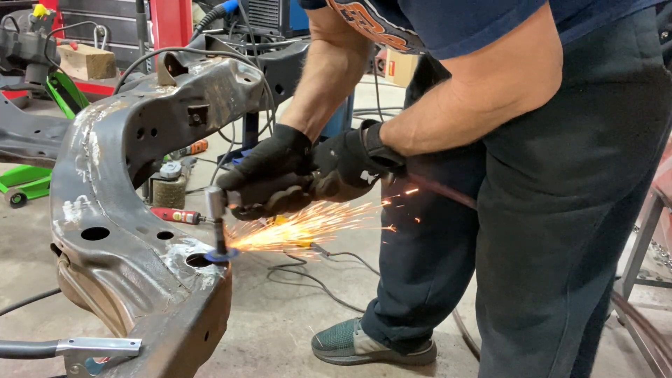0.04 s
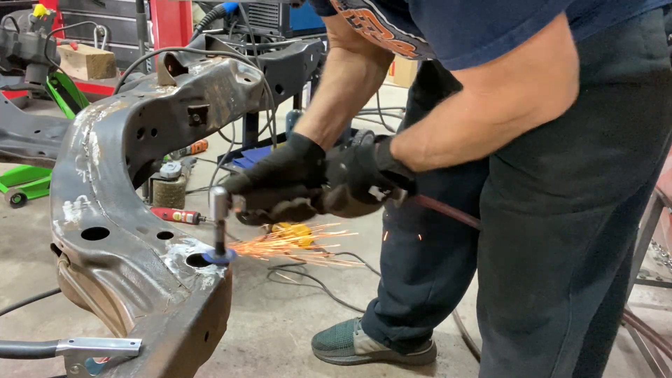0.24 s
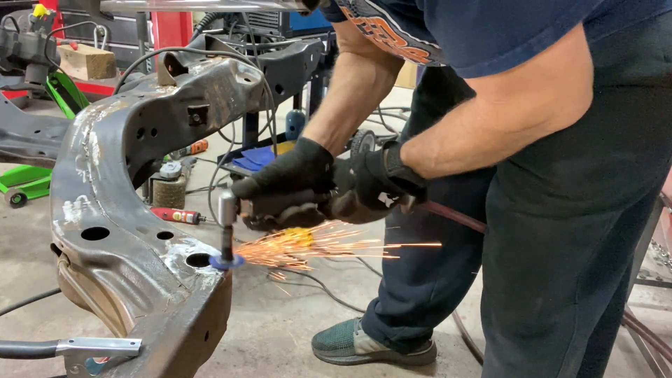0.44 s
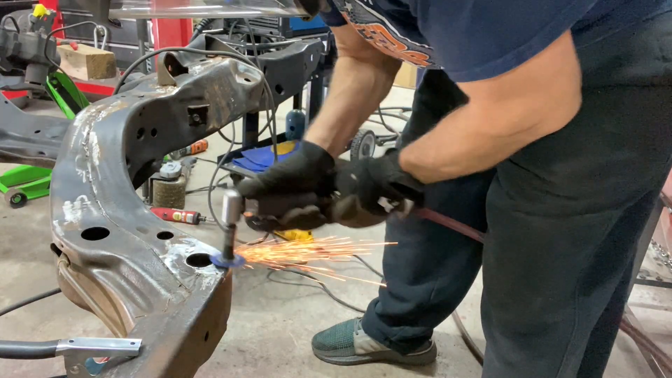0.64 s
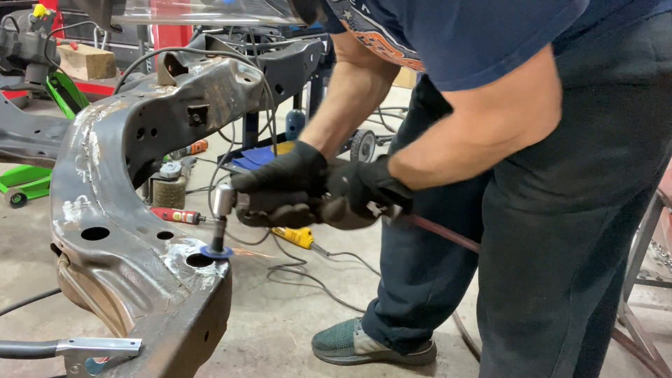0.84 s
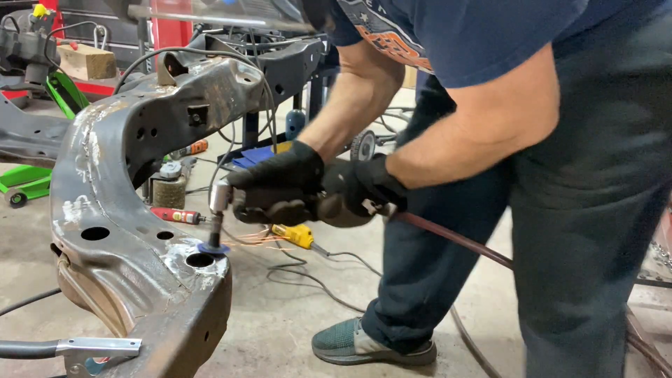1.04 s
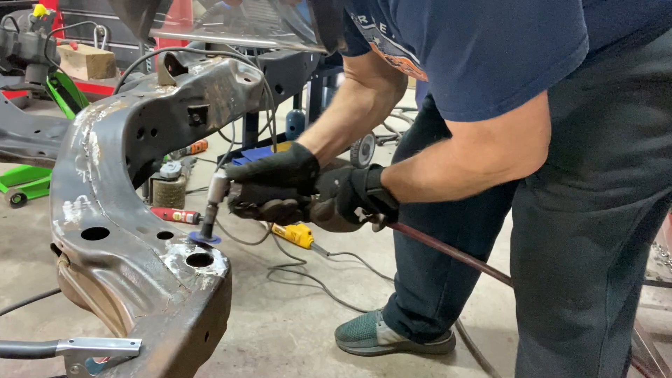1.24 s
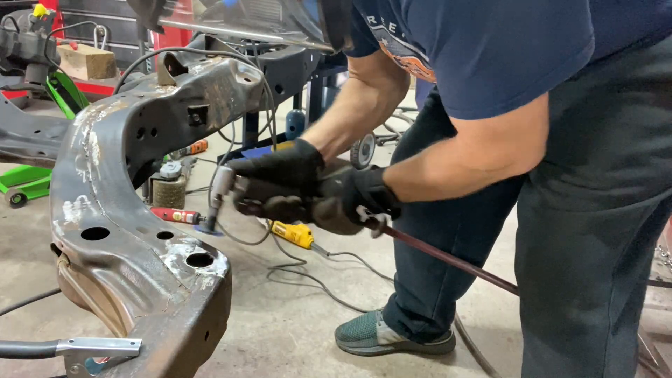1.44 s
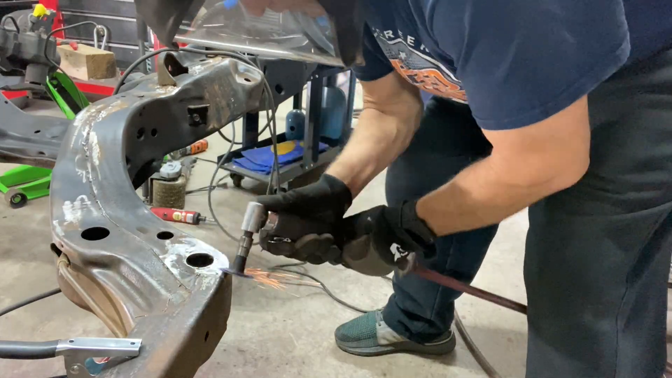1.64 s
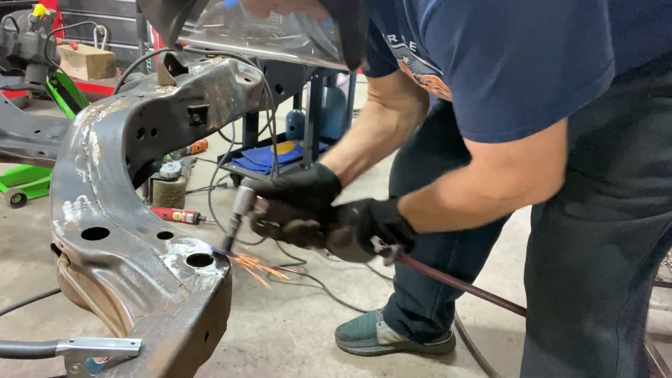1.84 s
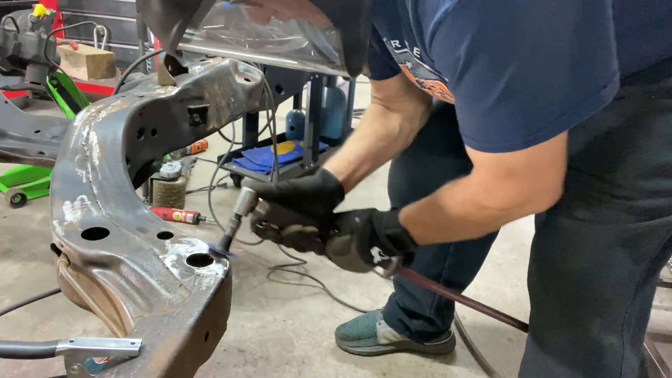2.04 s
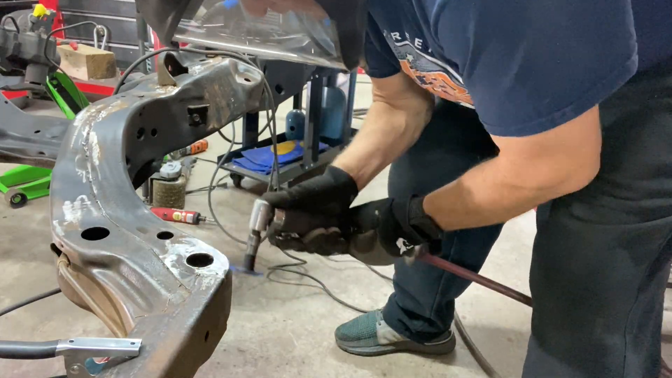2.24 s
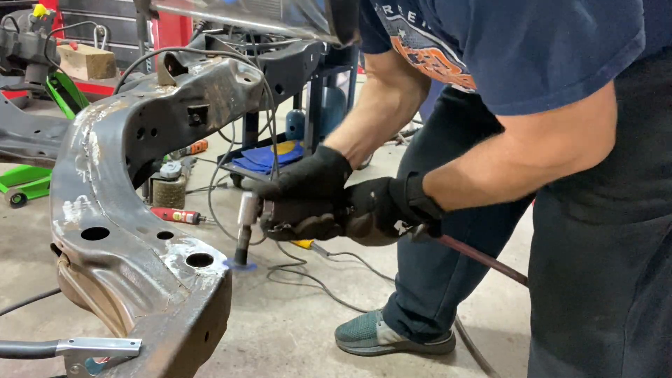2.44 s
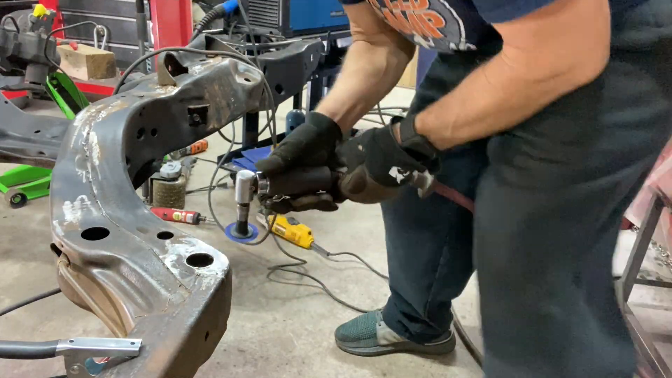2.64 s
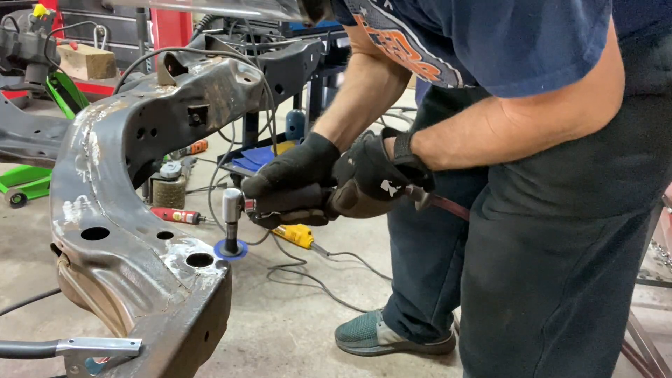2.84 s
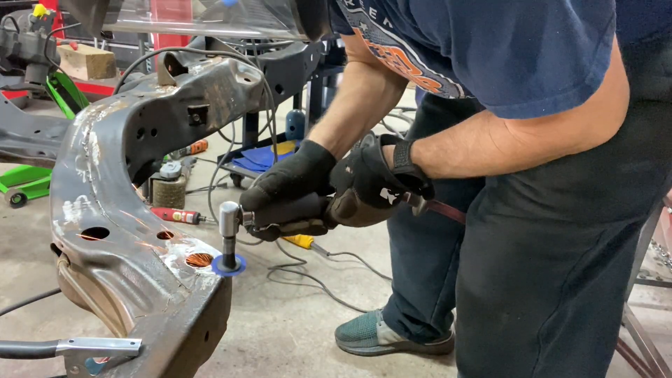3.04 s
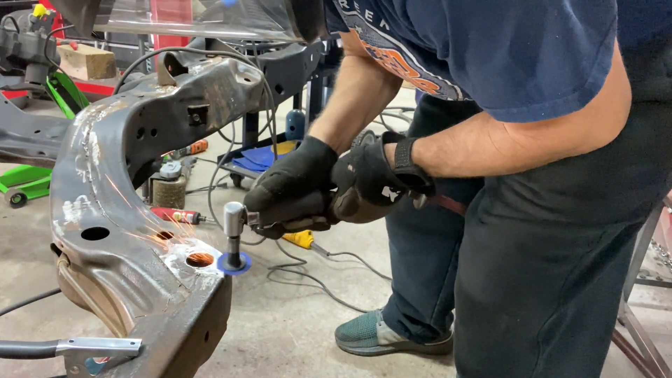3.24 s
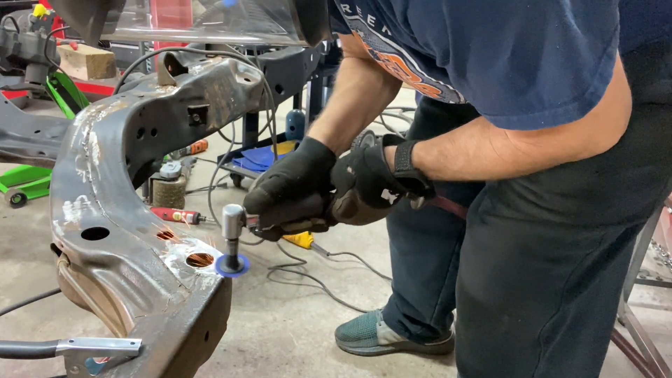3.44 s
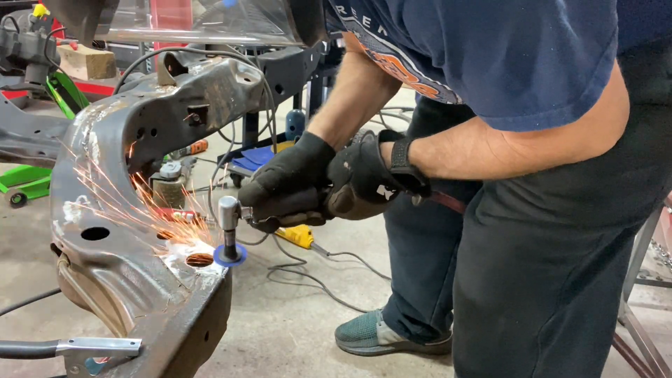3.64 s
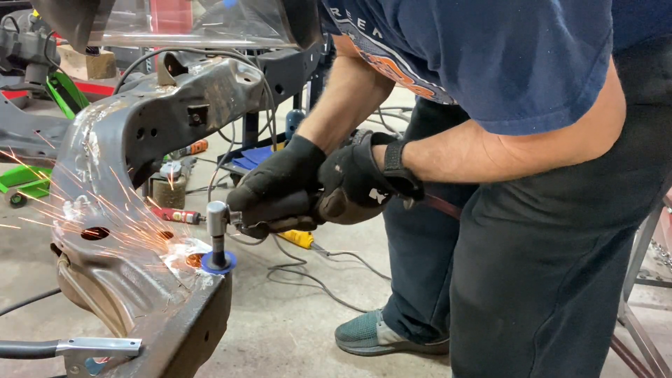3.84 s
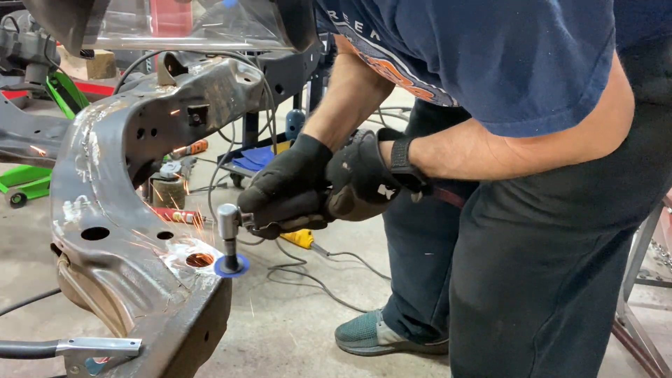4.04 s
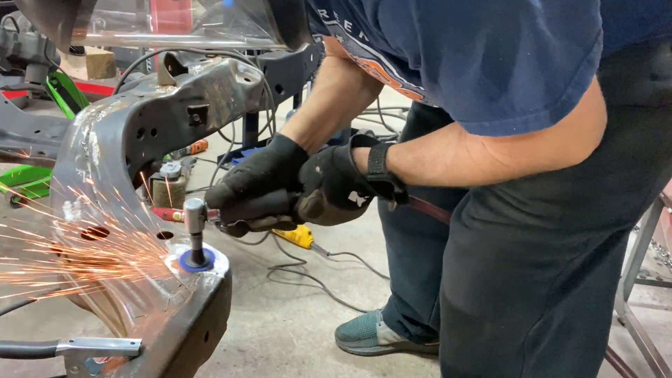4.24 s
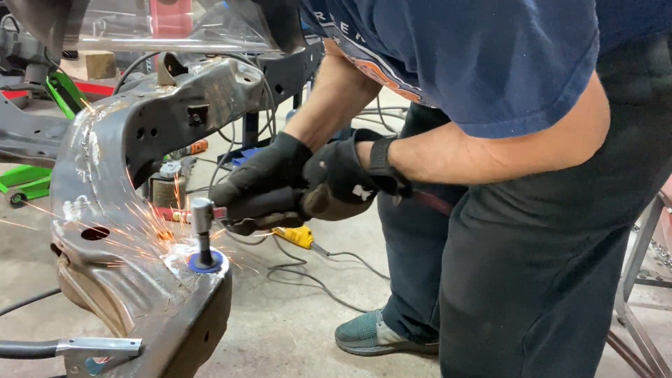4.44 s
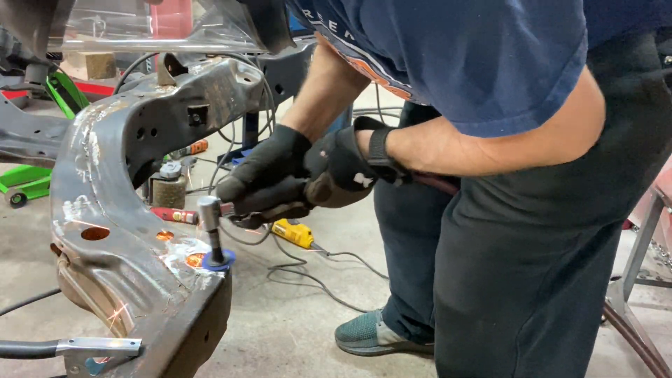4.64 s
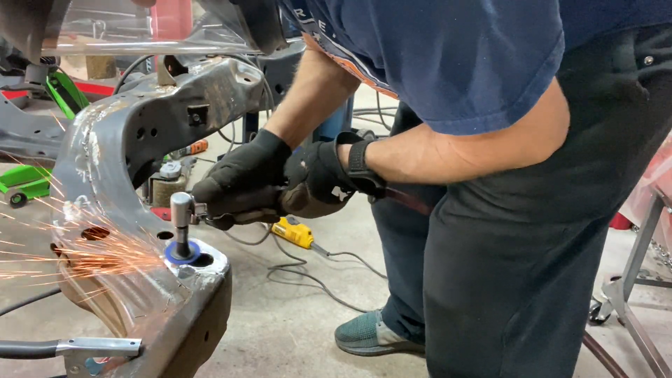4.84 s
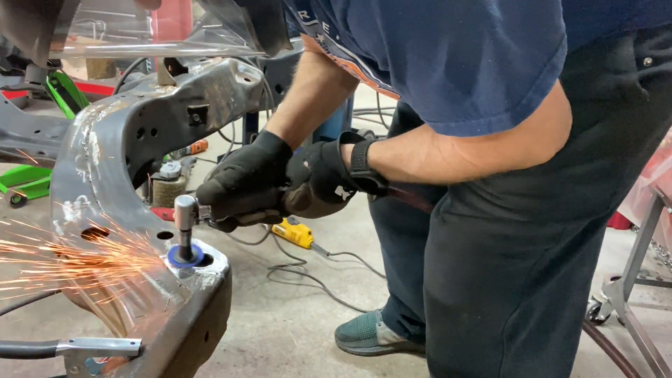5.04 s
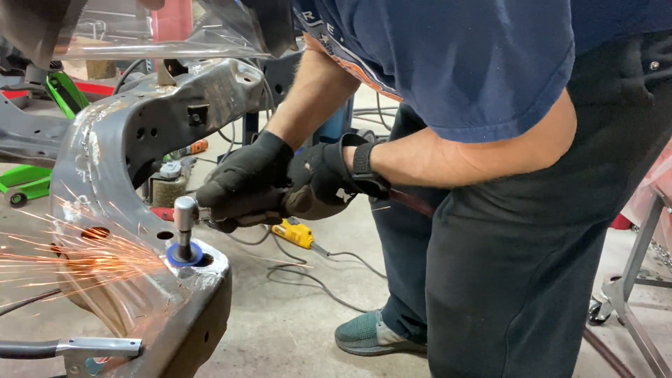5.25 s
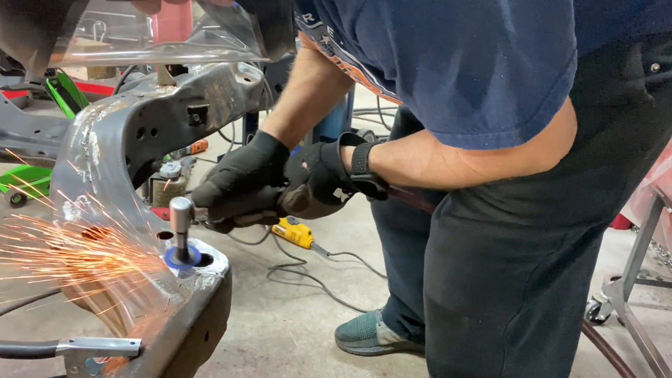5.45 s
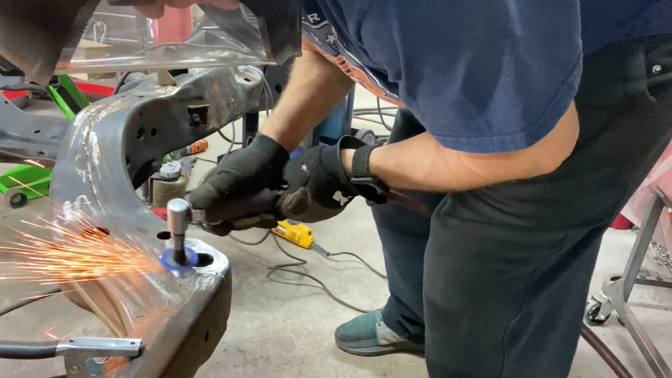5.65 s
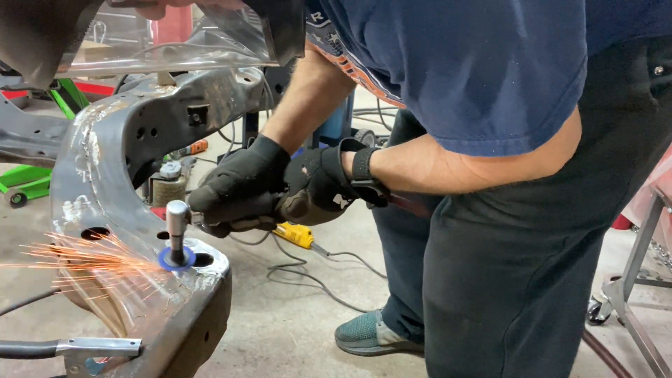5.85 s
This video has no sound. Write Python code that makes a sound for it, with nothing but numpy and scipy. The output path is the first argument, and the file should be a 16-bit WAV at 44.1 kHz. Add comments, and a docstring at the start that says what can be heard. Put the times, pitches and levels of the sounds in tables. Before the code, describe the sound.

A small air grinder runs from the first instant, close up in a garage: a shrill, slightly unsteady whine around 3 kHz with a higher overtone, spiky exhaust hiss and dry gritty scraping on sheet steel. Pitch wavers with pressure, climbing near 1.3 s. At about 1.36 s the air is cut for a moment; the whine dives, hiss drops away, and a small knock brings it racing back at 1.5 s. It runs higher and uneven, until a longer release at 2.5 s: the rotor coasts down with a second thin whine gliding beneath the fade, nearly quiet, then light valve clicks and a fast spin-up at 2.8 s. From about 3.1 s it bears down and drops in pitch. From 3.45 s the tone warbles seven to ten times a second, rising towards 4.9 s, then sagging to about 2.5 kHz, still grinding at the end. Short echoes, bright stereo, little bass.

```python
"""A bright, wavering whine with hiss and gritty scraping: a four-vane air motor drives an abrasive disc
on sheet steel in a garage. Vanes chopping the exhaust are sines on multiples of a load-dependent rate;
hiss, scrape, panel ring, rumble and room tone are banded noise.
Twice the trigger is let go: the rotor coasts down, a second whine glides, and it spins up again.
Damped modes make the valve knocks; a decaying noise tail makes the echoes."""
import sys
import numpy as np
from scipy import signal
from scipy.io import wavfile
from scipy.ndimage import uniform_filter1d

SR = 44100
rng = np.random.default_rng(int(sys.argv[2]) if len(sys.argv) > 2 else 0)


def bounce(signal):
    """Save signal as a 16-bit WAV file at the path given by the first command-line argument."""
    frames = np.transpose(np.atleast_2d(signal))
    limited = np.clip(frames, -1, 1)
    pcm = np.round(limited * 32767).astype(np.int16)
    wavfile.write(sys.argv[1], SR, pcm)


N = 260190

# Loaded motor speed: time_s, vane_pass_hz
LOADED_SPEED = [(0.0, 3090), (0.11, 3071), (0.161, 2973), (0.281, 3063), (0.33, 2975), (0.375, 3150),
                (0.531, 3055), (0.651, 3272), (0.786, 3006), (0.831, 3174), (0.908, 3175), (0.945, 3053),
                (0.981, 3157), (1.092, 3280), (1.203, 3150), (1.278, 2936), (1.311, 3496), (1.345, 3693),
                (1.362, 3591), (1.551, 3802), (1.587, 3830), (1.644, 3244), (1.707, 3416), (1.75, 3145),
                (1.848, 3630), (1.925, 3377), (2.031, 3050), (2.076, 3124), (2.14, 3590), (2.235, 3393),
                (2.34, 3640), (2.42, 3578), (2.445, 3340), (2.505, 3364), (2.856, 3603), (2.985, 3608),
                (3.045, 3360), (3.135, 3224), (3.183, 3094), (3.267, 3136), (3.318, 2840), (3.372, 2800),
                (3.393, 2985), (3.41, 2753), (3.445, 2893), (3.49, 2772), (3.56, 3022), (3.7, 3154),
                (4.2, 3170), (4.4, 3293), (4.75, 3312), (4.86, 3420), (4.9, 3330), (4.953, 3578),
                (4.998, 2943), (5.067, 3143), (5.103, 2990), (5.16, 2950), (5.2, 2642), (5.25, 2895),
                (5.285, 2890), (5.35, 2875), (5.6, 2627), (5.8, 2621), (5.9, 2514)]
# Trigger let go: air_off_s, air_on_s, coast_time_constant_s, spin_up_time_constant_s
AIR_CUTS = [(1.364, 1.505, .145, .026), (2.506, 2.806, .16, .029)]
# Hand rocking the disc over the weld: from_s, to_s, swings_per_s, first_depth_hz, last_depth_hz
ROCKING = [(3.448, 4.165, 7.86, 109, 107.7), (4.274, 4.935, 6.95, 80, 99.5),
           (5.28, 5.585, 9.83, 150.6, 251.7), (5.587, 5.784, 10.1, 138, 158.4),
           (5.782, 5.952, 10.5, 241, 320)]
# Vane tone, air on: time_s, level_db
VANE_LEVEL = [(0, -27.5), (.5, -25.5), (.59, -30), (.65, -21.5), (.7, -27), (1.09, -28), (1.27, -29),
              (1.4, -27.5), (1.56, -28), (1.746, -27.5), (1.9, -23), (1.985, -37.5), (2.03, -30.5),
              (2.27, -23), (2.345, -37), (2.4, -26), (2.94, -28), (2.99, -27.5), (3.08, -34.5), (3.11, -24),
              (3.5, -26.5), (4.36, -27), (4.42, -30.5), (4.51, -24.5), (4.565, -31.5), (4.8, -26.5),
              (4.97, -25.5), (5.01, -20.5), (5.059, -35.5), (5.08, -19.5), (5.19, -30.5), (5.26, -25),
              (5.9, -28.5)]
# Rotor tone, stronger while the disc bears hard: time_s, level_db
ROTOR_LEVEL = [(0, -54.5), (.58, -55), (.65, -50.5), (1.1, -56.5), (1.3, -59), (2.5, -59.5), (3.05, -59),
               (3.2, -51.5), (4, -54), (4.8, -55.5), (5.2, -56), (5.9, -59.5)]
# Tones that follow speed: vane_pass_hz, octave_db, half_turn_db, fifth_of_vane_rate_db
LEVEL_BY_SPEED = [(2070, -28.5, -71, -62), (2452, -31, -54, -72), (2792, -32.5, -51, -69),
                  (3090, -40, -55, -64), (3220, -56, -61.5, -68.5), (3327, -42, -52, -66),
                  (3494, -54, -47, -58.5), (3690, -39, -45, -62.5)]
# Weaker orders of the vane-pass rate: multiple_of_vane_pass, level_re_vane_db, coasting_gain_db
SIDE_ORDERS = [(.4, -30.5, -17), (.6, -29.5, 2), (.75, -26, -5), (1.25, -10, -2), (1.75, -19, -8.0),
               (2.251, -26, 3), (2.498, -33, 3), (3, -27.5, 30), (3.499, -30.5, 12), (3.75, -39, 2),
               (4, -29.5, 0), (4.25, -26, 9)]
# Housing and exhaust port colour, on the side orders: frequency_hz, gain_db
HOUSING = [(400, -8.5), (1500, -2), (2500, 0), (4000, -25.5), (5500, 4.5), (6500, 1), (8500, 2.5),
           (12000, 14), (16000, -35)]
# Noise levels, air on: time_s, hiss_db, scrape_db, panel_db
NOISE_LEVELS = [(0.0, -28.5, -33.5, -49.5), (0.3, -30, -33.5, -48.5), (0.6, -31, -33.5, -47),
                (1.04, -27.5, -34, -47), (1.34, -28, -33.5, -45), (1.6, -26.5, -34, -57),
                (2.03, -28.5, -33.5, -52), (2.25, -27, -37, -48), (2.5, -29, -34.5, -47.5),
                (3.0, -24.5, -31, -41.5), (3.3, -28.5, -32.5, -48.5), (3.65, -28.5, -31.5, -47),
                (4.0, -28, -30, -43), (4.4, -26.5, -29.5, -40.5), (4.9, -26.5, -29.5, -40.5),
                (5.2, -28, -31.5, -41.5), (5.6, -31, -30.5, -40), (5.9, -31, -31, -42.5)]
# Left-right likeness of the noises: frequency_hz, correlation (no unit)
STEREO_LIKENESS = [(100, 0.72), (250, 0.91), (600, 1), (1200, 0.68), (2500, 0.043), (5000, 0.35),
                   (9000, 0.42), (14000, 0.056)]
# Exhaust hiss, relative density: frequency_hz, density_db_per_hz
HISS_SPECTRUM = [(3000, -32.5), (7000, -1), (8500, -6), (10000, 0), (12000, -2), (14000, 8.5),
                 (16000, -2.5)]
# Disc scrape, relative density: frequency_hz, density_db_per_hz
SCRAPE_SPECTRUM = [(1500, -18.5), (2500, 5.5), (3300, 12.5), (4000, 7.5), (5500, 14), (7000, 8.5),
                   (9000, 2.5), (16000, 9.5)]
# Panel ring, relative density: frequency_hz, density_db_per_hz
PANEL_SPECTRUM = [(500, -36), (750, -3.5), (1100, 5), (1300, 9.5), (1600, 14), (2100, 13), (3000, -42),
                  (16000, -53)]
# Rumble, relative density: frequency_hz, density_db_per_hz
RUMBLE_SPECTRUM = [(90, -22), (130, -12.5), (200, -22), (350, 0.5), (550, 3.5), (800, 6), (1500, 3.5),
                   (16000, -54)]
# Room tone, relative density: frequency_hz, density_db_per_hz
ROOM_SPECTRUM = [(59, -43), (100, -40), (438, -2), (564, -14.5), (898, -2), (5750, -6), (15500, -7.5)]
# Valve knocks: start_s, mode_peak_db, pitch_hz, t60_s
VALVE_KNOCKS = [(1.502, -35, 723.4, 0.042), (2.741, -43.5, 573, 0.027), (2.8, -32.5, 1493, 0.015),
                (2.811, -32.5, 650, 0.024)]

ROCK_FADE_S = 0.0152
TONE_HOLD_S, TONE_FADE_DB_PER_S, TONE_RETURN_S = 0.029, 316, 0.0049  # vane tone and octave, air cut
OCTAVE_LAG_DB_PER_S, OCTAVE_RETURN_S, OCTAVE_COAST_DROP_DB = 73, 0.087, 6
UNDERTONE_DROP_DB, UNDERTONE_RETURN_S = 45, .014
HALF_SWELL_DB_PER_S, HALF_SETTLE_S = 35, .25
RUMBLE_DB, ROOM_TONE_DB = -55.5, -59
ECHO_DB, ECHO_T60_S, ECHO_DELAY_S, WALL_CUT_HZ = -8, .2, .006, 10000
BASS_CUT_HZ, TOP_CUT_HZ = 125, 15900
OPPOSED = np.array([[1], [-1]])  # left, right
TIME_S = np.arange(N) / SR


def from_db(db):
    """Decibels to gain."""
    return 10 ** (np.asarray(db) / 20)


def rms_one(x):
    """Scale to unit rms."""
    return x / np.sqrt(np.mean(x ** 2) + 1e-20)


def in_time(table):
    """Read each column at every sample, linearly."""
    time_s, *columns = np.transpose(table)
    return [np.interp(TIME_S, time_s, column) for column in columns]


def at_hz(points, hz):
    """Read a spectrum on a log-frequency axis."""
    point_hz, db = np.transpose(points)
    return np.interp(np.log(hz), np.log(point_hz), db)


def drift(rate_hz):
    """Slow chance, unit rms: noise through a double one-pole low-pass, run at SR / 20."""
    pole = np.exp(-2 * np.pi * rate_hz * 20 / SR)
    noise = rng.standard_normal(N // 20 + 2002)
    slow = signal.lfilter([1], [1, -2 * pole, pole ** 2], noise)[2000:]  # settled part
    return np.interp(np.arange(N) / 20, np.arange(len(slow)), rms_one(slow))


def smooth_curve(rows):
    """Cubic through the rows that never overshoots: flat at turning points."""
    time_s, value = np.transpose(rows)
    step = np.diff(value) / np.diff(time_s)
    product = step[:-1] * step[1:]
    harmonic_mean = 2 * product / (step[:-1] + step[1:] + 1e-9)
    slope = np.r_[step[0], np.where(product > 0, harmonic_mean, 0), step[-1]]
    i = np.clip(np.searchsorted(time_s, TIME_S) - 1, 0, len(time_s) - 2)
    width_s = time_s[i + 1] - time_s[i]
    u = np.clip((TIME_S - time_s[i]) / width_s, 0, 1)
    ends = value[i] + (value[i + 1] - value[i]) * u * u * (3 - 2 * u)
    return ends + width_s * u * (1 - u) * (slope[i] * (1 - u) - slope[i + 1] * u)


def air_off_s(recover_s):
    """Seconds since the air was cut, decaying exponentially to zero once it returns."""
    out = 0
    for off_s, on_s, _, _ in AIR_CUTS:
        since_s = np.clip(TIME_S - off_s, 0, on_s - off_s)
        out = out + since_s * np.exp(-np.maximum(TIME_S - on_s, 0) / recover_s)
    return out


def rocking():
    """Speed swing in Hz as the disc is rocked: each spell starts with a sag."""
    out = 0
    for from_s, to_s, swings_per_s, first_hz, last_hz in ROCKING:
        spell = np.clip(np.minimum(TIME_S - from_s, to_s - TIME_S) / ROCK_FADE_S, 0, 1)
        depth_hz = np.interp(TIME_S, [from_s, to_s], [first_hz, last_hz])
        out = out - depth_hz * spell * np.sin(2 * np.pi * swings_per_s * (TIME_S - from_s))
    return out


def vane_rate():
    """Loaded speed in Hz; drag slows the rotor without air, fresh air restores it exponentially."""
    hz = smooth_curve(LOADED_SPEED) + rocking()
    for off_s, on_s, coast_s, spin_up_s in AIR_CUTS:
        since_s = np.clip(TIME_S - off_s, 0, on_s - off_s)
        coasting = (1 + since_s / coast_s) ** -3
        missing = (1 - coasting) * np.exp(-np.maximum(TIME_S - on_s, 0) / spin_up_s)
        hz = hz * (1 - missing)
    return hz


def tone_levels(hz):
    """Tone levels in dB: some follow speed, all respond to the air being cut."""
    speed_hz, *columns = np.transpose(LEVEL_BY_SPEED)
    octave_db, half_db, fifth_db = [np.interp(hz, speed_hz, column) for column in columns]
    off_s = air_off_s(TONE_RETURN_S)
    fade_db = TONE_FADE_DB_PER_S * np.maximum(off_s - TONE_HOLD_S, 0)
    # tones below the vane tone drop without a hold
    drop_db = UNDERTONE_DROP_DB * np.minimum(air_off_s(UNDERTONE_RETURN_S) / TONE_HOLD_S, 1)
    # the octave is weaker while coasting and returns late
    late_db = OCTAVE_LAG_DB_PER_S * (air_off_s(OCTAVE_RETURN_S) - off_s)
    late_db += OCTAVE_COAST_DROP_DB * np.minimum(off_s / TONE_HOLD_S, 1)
    # the half-turn tone stays stronger for a while after a pause
    half_db = half_db + HALF_SWELL_DB_PER_S * air_off_s(HALF_SETTLE_S) - drop_db
    vane_db = in_time(VANE_LEVEL)[0] - fade_db
    rotor_db = in_time(ROTOR_LEVEL)[0] - drop_db
    return vane_db, octave_db - fade_db - late_db, half_db, rotor_db, fifth_db - drop_db


def motor(waver, flutter_db, side_flutter_db):
    """Chopped exhaust: sines on multiples of the vane-pass rate, each fluttering by itself."""
    hz = vane_rate() * (1 + waver * drift(38.2))
    vane_db, octave_db, half_db, rotor_db, fifth_db = tone_levels(hz)
    phase = 2 * np.pi * np.cumsum(hz) / SR
    # multiple, level_db, left_minus_right_db, mean_port_lag_rad
    orders = [(1, vane_db, -4.0, 1.13), (2, octave_db, -0.5, 0.86), (.5, half_db, 2.0, 1.12),
              # half-turn imbalance also rides on the vane tone
              (1.5, 1.467 * half_db + 24.0, 1.0, 0.82),
              (.25, rotor_db, -2.5, 0.052), (.2, fifth_db, 1.0, 0.077)]
    drive_db = uniform_filter1d(vane_db, size=1500)
    coasting = np.minimum(air_off_s(0.0036) / 0.058, 1)
    for multiple, relative_db, coast_db in SIDE_ORDERS:
        level_db = drive_db + relative_db + coast_db * coasting
        level_db = level_db + at_hz(HOUSING, multiple * hz) + side_flutter_db * drift(24)
        orders.append((multiple, level_db, -.8, .8))
    out = np.zeros((2, N))
    for multiple, level_db, pan_db, mean_lag_rad in orders:
        lag_rad = mean_lag_rad * (1 + 0.45 * drift(9.9))  # reflections shift as the tool moves
        blur_rad = .3 * multiple * drift(50)  # uneven vane sliding smears higher orders
        start_rad = rng.uniform(0, 2 * np.pi)
        tone = np.sin(multiple * phase + blur_rad + start_rad + lag_rad * OPPOSED / 2)
        gain = from_db(level_db + flutter_db * drift(42) + pan_db * OPPOSED / 2)
        out += np.sqrt(2) * gain * tone  # levels are rms
    return out


def banded_noise(spectrum, patchy_db, grit_db=0.):
    """Unit-rms third-octave noise, each band with its own flicker and likeness; grit makes it spiky."""
    out, together = 0, drift(6)
    edges_hz = 90 * 2 ** (np.arange(24) / 3)
    spikes_db = grit_db * np.minimum(rng.exponential(1, N), 4)
    white = rng.standard_normal((2, 2, N)) * from_db(spikes_db)
    for k, (low_hz, high_hz) in enumerate(zip(edges_hz, edges_hz[1:])):
        centre_hz = np.sqrt(low_hz * high_hz)
        band = signal.butter(2, [low_hz, high_hz], "band", fs=SR, output="sos")
        mid, side = signal.sosfilt(band, white[k % 2])
        alike = np.clip(at_hz(STEREO_LIKENESS, centre_hz), -1, 1)
        flicker = 0.54 * together + drift(20.0) + 0.8 * drift(2.06)
        gain = from_db(at_hz(spectrum, centre_hz) + patchy_db * flicker)
        out = out + gain * (np.sqrt(1 + alike) * mid + np.sqrt(1 - alike) * side * OPPOSED)
    return rms_one(out)


def exhaust_hiss(level_db):
    """Escaping air as spiky noise, dying away when the air is cut."""
    level_db = level_db - 190 * air_off_s(0.019)  # dB per s
    return from_db(level_db - .7 * OPPOSED) * banded_noise(HISS_SPECTRUM, patchy_db=1.3, grit_db=2.4)


def disc_scrape(level_db):
    """Grit on steel as spiky noise, dying away when the air is cut."""
    level_db = level_db - 160 * air_off_s(0.0019)  # dB per s
    return from_db(level_db - .3 * OPPOSED) * banded_noise(SCRAPE_SPECTRUM, patchy_db=1.4, grit_db=2.6)


def panel_ring(level_db):
    """Sheet-steel ring as patchy mid-band noise, dying away when the air is cut."""
    level_db = level_db - 110 * air_off_s(0.0016)  # dB per s
    return from_db(level_db + .3 * OPPOSED) * banded_noise(PANEL_SPECTRUM, patchy_db=3.0, grit_db=1.8)


def rumble():
    """Low patchy noise, dying away when the air is cut."""
    level_db = RUMBLE_DB - 70 * air_off_s(0.0054)  # dB per s
    return from_db(level_db) * banded_noise(RUMBLE_SPECTRUM, patchy_db=2.5, grit_db=3)


def room_tone():
    """Quiet noise floor whose mean level ignores the air."""
    return from_db(ROOM_TONE_DB) * banded_noise(ROOM_SPECTRUM, patchy_db=.6)


def garage(x):
    """Dense echoes: a dulled noise tail per side, decaying exponentially after a short delay."""
    t = np.arange(SR // 2) / SR
    pole = np.exp(-2 * np.pi * WALL_CUT_HZ / SR)
    decay = from_db(-60 * t / ECHO_T60_S) * (t > ECHO_DELAY_S)
    tail = signal.lfilter([1], [1, -pole], rng.standard_normal((2, len(t))) * decay)
    unit_energy = rms_one(tail) / np.sqrt(len(t))
    return signal.fftconvolve(x[None], unit_energy, axes=1)[:, :N]


def slow_glide(start_hz, fall_s, start_db, fade_db_per_s):
    """Second whine that falls more slowly than the vane tone, heard only while the air is cut."""
    out = np.zeros(N)
    for off_s, on_s, _, _ in AIR_CUTS:
        since_s = np.clip(TIME_S - off_s, 0, on_s - off_s)
        cycles = start_hz * fall_s * (1 - np.exp(-since_s / fall_s))  # exponential pitch fall
        swell = np.clip(since_s / 0.039, 0, 1) ** 2 * (TIME_S < on_s)
        level_db = start_db - fade_db_per_s * since_s + 2.0 * drift(30)
        out += swell * from_db(level_db) * np.sin(2 * np.pi * cycles)
    return out


def trigger():
    """Valve lever knocks: a damped mode with a puff of air under the same decay."""
    out = np.zeros(N)
    puff = rms_one(signal.lfilter([1], [1, -1.5, .6], rng.standard_normal(N)))
    for start_s, peak_db, pitch_hz, t60_s in VALVE_KNOCKS:
        t = TIME_S - start_s
        decay = (t > 0) * from_db(peak_db - 60 * np.abs(t) / t60_s)
        out += decay * (np.sin(2 * np.pi * pitch_hz * t) + 0.37 * puff)
    return out


def scene():
    """Tool and its echoes, plus the noises and a quiet floor."""
    hiss_db, scrape_db, panel_db = in_time(NOISE_LEVELS)
    tool = motor(waver=.003, flutter_db=2.0, side_flutter_db=3.0)
    tool = tool + slow_glide(start_hz=5100, fall_s=.122, start_db=-37, fade_db_per_s=130)
    tool = tool + trigger()
    echoes = from_db(ECHO_DB) * garage(tool.mean(axis=0))
    noises = exhaust_hiss(hiss_db) + disc_scrape(scrape_db) + panel_ring(panel_db) + rumble()
    return tool + echoes + noises + room_tone()


def record(dry):
    """The microphone drops the bass; the top is cut steeply."""
    bass_cut = signal.butter(4, BASS_CUT_HZ, "high", fs=SR, output="sos")
    top_cut = signal.ellip(12, .5, 70, TOP_CUT_HZ, fs=SR, output="sos")
    return signal.sosfilt(top_cut, signal.sosfilt(bass_cut, dry))


dry = scene()
out = record(dry)
bounce(out)
```